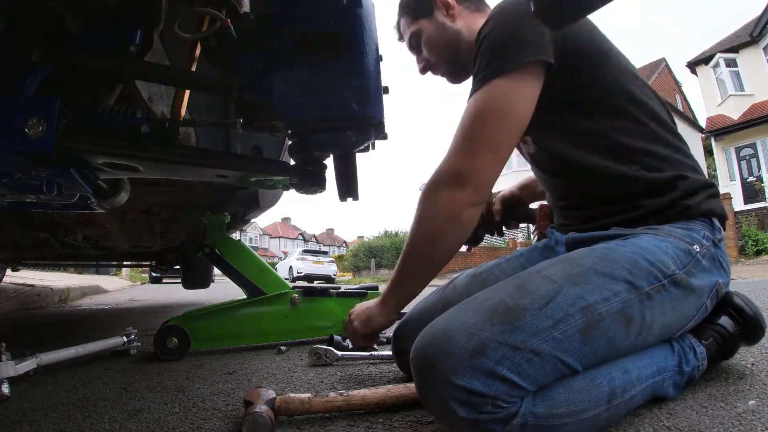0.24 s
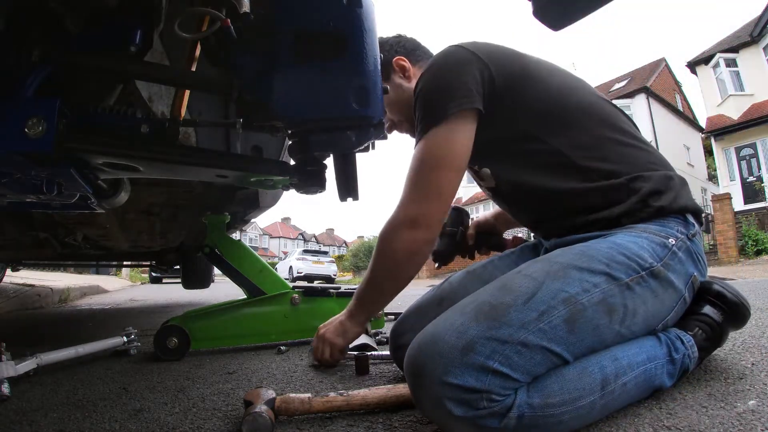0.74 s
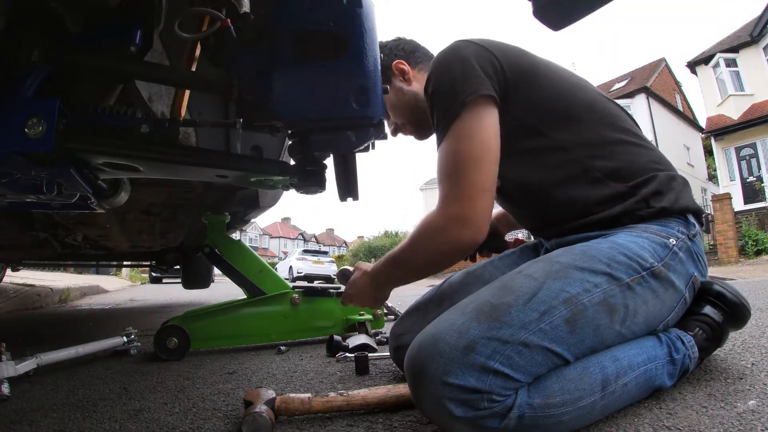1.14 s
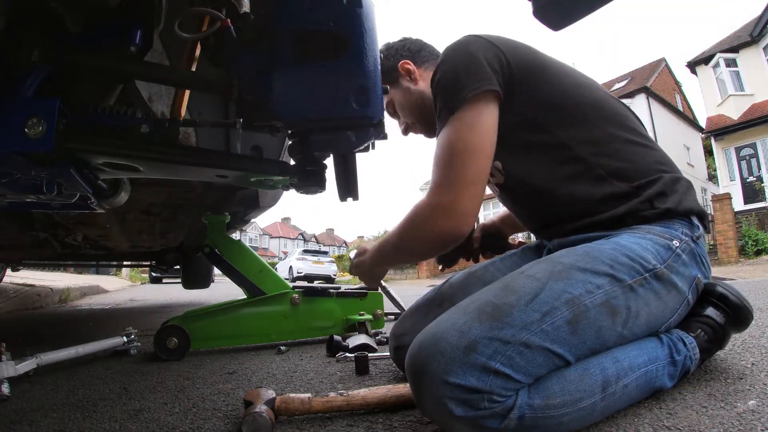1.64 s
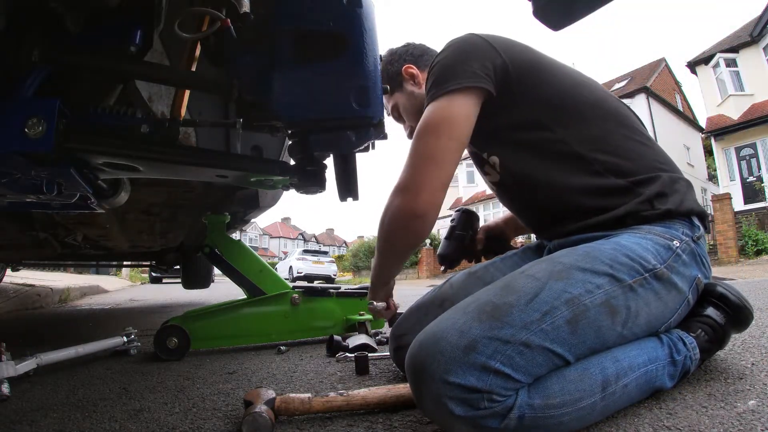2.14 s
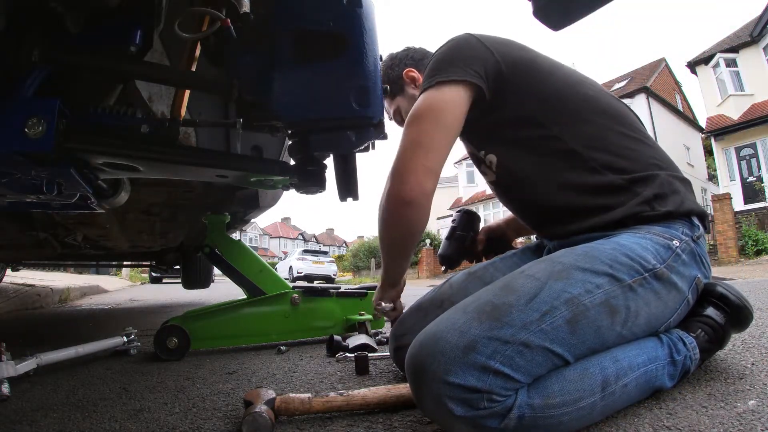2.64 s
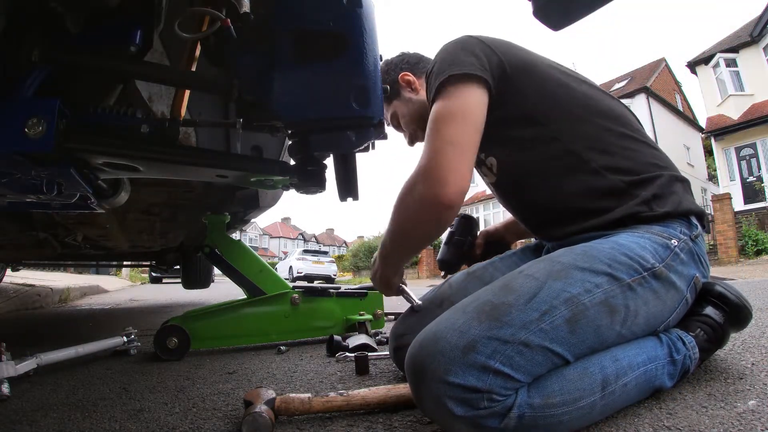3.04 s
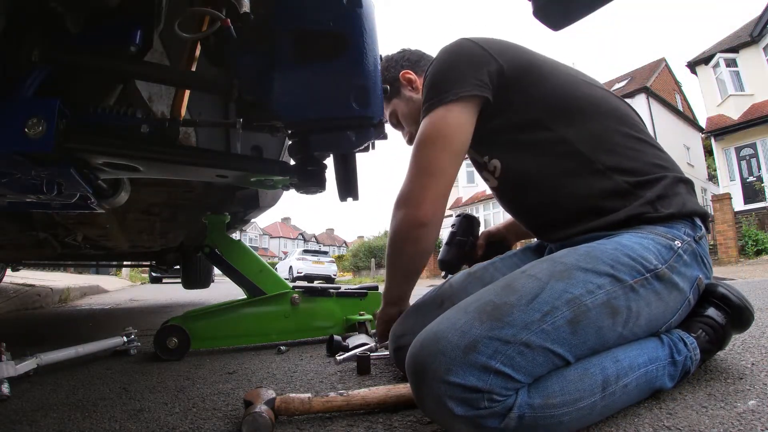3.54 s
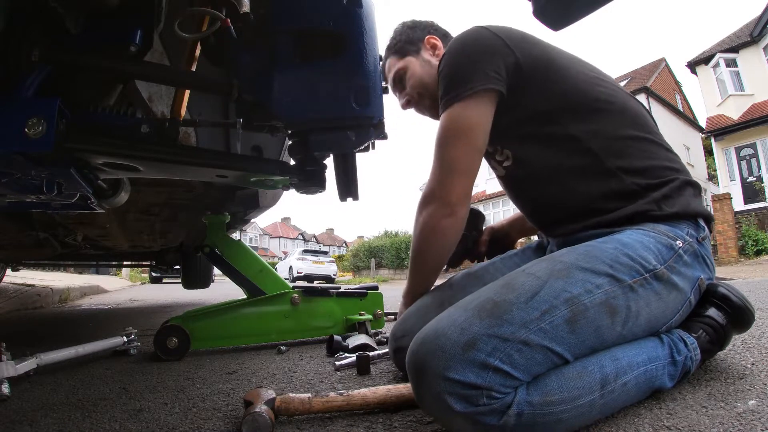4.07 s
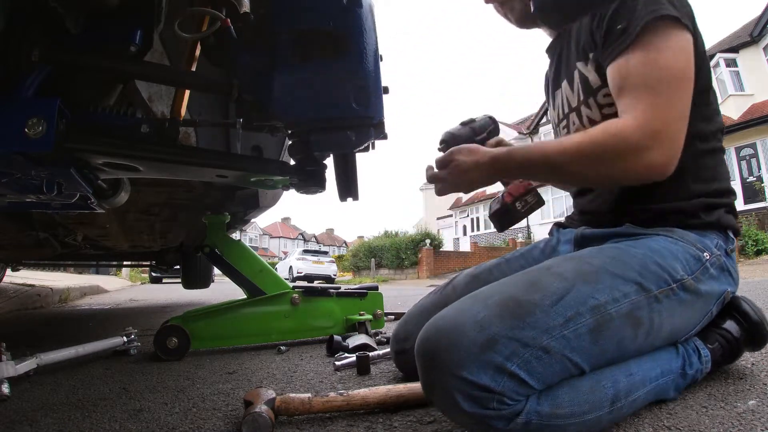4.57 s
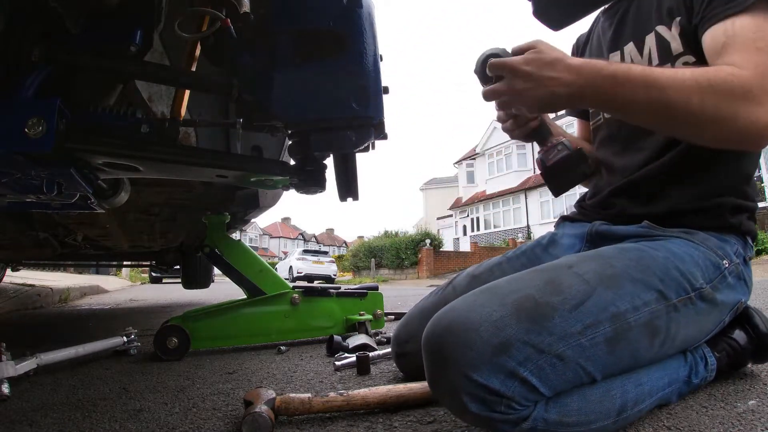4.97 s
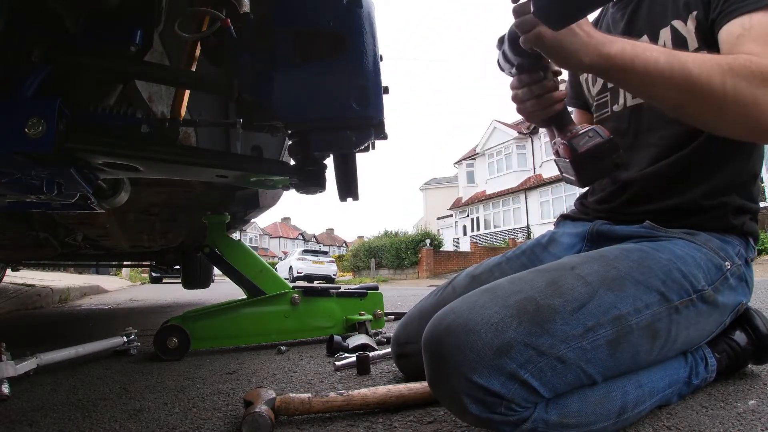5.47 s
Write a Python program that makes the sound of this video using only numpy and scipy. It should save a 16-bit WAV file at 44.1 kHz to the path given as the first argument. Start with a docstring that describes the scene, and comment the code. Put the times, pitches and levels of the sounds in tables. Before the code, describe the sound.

Close, dry metal handling outdoors: a couple of thumps and a tiny squeak on tarmac, small clinks around one second, then near silence with soft street rumble. At three seconds a hard bright clank rings out, followed by a denser clatter half a second later, trailing into faint taps. The car's underside adds a short dull echo; far birds call faintly. Centred sound, microphone low beside the tools.

```python
"""On the tarmac beside a jacked-up car, steel sockets and an extension bar are picked over.
They knock (short noise bursts), scrape (trains of tiny impacts) and ring (fading sine waves)
until a neighbour or the hand stills them; the underbody throws knocks and scrapes back as an echo.
Around them: a breezy suburban street and rustling clothes (shaped noise), a low hum and boom,
and a few far bird calls (gliding tones with overtones)."""
import sys
import numpy as np
from scipy import signal
from scipy.fft import rfft, irfft, next_fast_len
from scipy.io import wavfile

SR = 44100
rng = np.random.default_rng(int(sys.argv[2]) if len(sys.argv) > 2 else 0)


def materialize(psi):
    """Save the field psi as 16-bit PCM at rate SR to the path in sys.argv[1].

    A 1-D psi becomes a single channel; in a 2-D psi each row is a channel.
    """
    bounded = np.clip(np.atleast_2d(psi).T, -1, 1)
    quanta = np.round(bounded * 32767).astype(np.int16)
    wavfile.write(sys.argv[1], SR, quanta)


N = 251811
TIME = np.arange(N) / SR   # seconds

# street loudness over time: time_s, deep_rumble_db, hollow_body_db
STREET_LEVELS = [(0.0, -49, -55.5), (0.17, -52.5, -47), (1.19, -47, -40.5), (1.54, -45, -50.5),
                 (2.11, -55, -46), (2.16, -41, -46), (2.29, -47.5, -45.5), (3.12, -42.5, -46),
                 (3.28, -64.5, -50), (3.67, -54.5, -55), (4.91, -59.5, -49.5), (4.96, -43, -60),
                 (5.01, -54.5, -44), (5.17, -62, -50.5), (5.23, -42, -53.5), (5.47, -57, -50.5),
                 (5.66, -45, -48.5), (5.71, -46.5, -51.5)]
# street hiss loudness over time: time_s, level_db
HISS_LEVELS = [(0, -61.5), (.95, -61.5), (1.3, -66.5), (2.7, -67), (4.0, -66.5), (5.1, -65.5), (5.71, -66)]
# colour of the deep rumble, the hollow body and the hiss: frequency_hz, level_db (per Hz)
DEEP_COLOUR = [(11, -37.5), (18, -3.5), (32, -1), (81, 6.5), (124, -4.5), (160, -11), (210, -33),
               (350, -120)]
BODY_COLOUR = [(65, -37.5), (110, -19), (129, -7), (200, 0.5), (306, -13), (335, -15), (398, -18.5),
               (433, -27), (700, -33.5), (910, -56), (1540, -120)]
HISS_COLOUR = [(280, 5), (480, 0.5), (745, 3), (1720, -9), (2140, -12), (3090, -19.5), (4600, -20.5),
               (5250, -15.5), (6440, -16.5), (7350, -30.5), (10200, -30), (16000, -44)]
GUST_DB, GUSTS_PER_S = 1, 9   # spread and speed of the breeze's wavering
HUM_S, HUM_LENGTH_S, HUM_HZ, HUM_DB = 3.97, 0.28, 172.3, -43.5
THUD_S, THUD_DB, THUD_HZ, THUD_WIDTH_HZ, THUD_T60_S = 3.3, -42.5, 62, 45, .45

# gliding calls of the birds, and one lower call: start_s, length_s, middle_pitch_hz, level_db
BIRD_CALLS = [(1.01, .115, 1678, -45.5), (2.3, 0.18, 2167, -63.5), (2.8, 0.11, 1692, -46),
              (4.42, 0.18, 2324, -66), (5.61, 0.11, 2304, -64)]
LOW_CALL = [(-0.054, 0.16, 610, -52)]
# overtones of each kind of call: harmonic_number, level_db
BIRD_HARMONICS = [(1, -19), (2, -1), (3, -12), (4, -26)]
LOW_CALL_HARMONICS = [(1, -3.5), (2, -2.5), (3, -8), (4, -21)]
# pitch glide of each kind of call, as shares of the middle pitch: first_share, last_share
BIRD_GLIDE = (1, .72)
LOW_CALL_GLIDE = (1.02, 0.78)

# clothes rustle as the body leans and the arm reaches: start_s, length_s, level_db
MOVES = [(0.16, 0.4, -71), (.85, 0.39, -68), (1.5, 0.4, -76), (2.85, 0.54, -70), (3.498, 0.64, -67.5),
         (4.23, 0.74, -72.5), (4.903, 0.29, -74)]
# colour of rustling cloth: frequency_hz, level_db (per Hz)
CLOTH_COLOUR = [(500, -20.5), (1500, -1.5), (3500, 0.5), (6200, 0), (7500, -8.5), (10000, -15.5),
                (11500, -27.5), (16000, -43.5)]
RESTING_RUSTLE_DB = -75

# dull knocks of tools on the ground: start_s, level_db, brightness_hz
KNOCKS = [(0.159, -18.5, 1180), (0.291, -23, 950), (0.3619, -17.5, 4170), (0.3657, -24, 4000),
          (0.404, -34, 3480), (0.418, -26.5, 2000), (3.023, -18, 1490), (3.226, -36, 3500),
          (3.589, -22, 3170)]
# well-damped resonances of those knocks: frequency_hz, width_hz, level_db
KNOCK_BODY = [(376.5, 160, -10.5), (860, 400, -1.5), (1285, 210, 4), (1560, 260, 3), (2368, 330, 3.5),
              (2865, 81, 10), (3260, 360, 3.5), (4434, 280, 2.5), (5336, 340, -0.5), (8500, 1600, -14)]
KNOCK_RISE_CYCLES = 0.86   # counted at the brightness: the duller a knock, the longer it takes to build
# a squeak: start_s, length_s, middle_pitch_hz, level_db
SQUEAK = [(0.186, 0.0312, 2820, -46)]
# overtones of the squeak: harmonic_number, level_db
SQUEAK_HARMONICS = [(1, 0), (2, -10), (3, -11.5), (4, -29)]
# pitch glide of the squeak, as shares of the middle pitch: first_share, last_share
SQUEAK_GLIDE = (.82, 1.11)

# overall colour of the heap of tools: frequency_hz, level_db
HEAP_COLOUR = [(200, -8.5), (600, -11), (1200, -4), (2000, -2), (8000, 0.5), (10000, -8), (10900, -21.5),
               (14500, -19), (16000, -48.5)]
# resonances of the heap of tools: frequency_hz, width_hz, boost_db
HEAP_PEAKS = [(1250, 8.8, 12), (2026, 120, 6.3), (2110, 37, 3.2), (2844, 110, 10), (3150, 180, 6),
              (3575, 270, 11), (4420, 51, 5.6), (4670, 520, 8.8), (6250, 330, 10), (7530, 150, 6),
              (8170, 100, 6), (9100, 57, 2.6), (10020, 260, 12), (11870, 250, 6), (14050, 350, 8)]
# steel dragged over steel and grit: start_s, length_s, level_db (before the stroke shape), brightness_hz
SCRAPES = [(0, 0.044, -66, 1370), (0.186, 0.11, -58.5, 2760), (0.376, 0.24, -65.5, 2380),
           (0.764, 0.11, -42.5, 5000), (1.02, 0.065, -57, 5000), (3.032, 0.24, -45.5, 9000),
           (3.596, .17, -36.5, 8250), (3.901, 0.095, -56, 1820), (4.073, 0.12, -55, 2170),
           (4.522, 0.084, -82, 5000)]

# a tool lands on one end, then slaps down on the other:
# start_s, level_db, treble_tilt_db (per octave), gap_s, second_touch_db, bar_ring_db
CLANKS = [(0.7656, -34.5, -3.5, 0.017, -31, -45.5), (1.0165, -36, -6, 0.0098, -27, -30),
          (1.0624, -46, -5, 0.0047, -33, -41.5), (3.0255, -18, 6, 0.011, -17, -37),
          (3.5034, -23.5, -2, 0.0039, -18.5, -32), (3.5905, -18.5, -2, .013, -25.5, -18),
          (3.6385, -11.5, 1, 0.024, -23, -18.5), (3.6959, -22, 3.5, 0.014, -15.5, -25.5),
          (4.119, -31.5, 4.5, .0155, -33.5, -71)]
# added to the tilt, dB per octave: the slap is brighter than the landing
FIRST_TILT_DB, SECOND_TILT_DB = -0.5, 4.5
# a tool rocks to rest in three even touches:
# start_s, level_db, treble_tilt_db (per octave), gap_s, loss_per_touch_db
RATTLES = [(0.8402, -28.5, -2.5, 0.028, 4), (3.7368, -22.5, 8, .0265, 12.5)]
# single light touches: start_s, level_db, treble_tilt_db (per octave)
TAPS = [(0.7383, -45, -3.5), (0.8114, -33, 4), (0.9624, -40.5, -5), (0.9825, -43, -4), (1.148, -49.5, -7),
        (1.298, -43, 0.5), (2.1024, -55, 1), (3.1706, -23.5, 4.5), (3.916, -30.5, -0.5),
        (4.0362, -45.5, 3.5), (4.337, -46.5, 2), (4.3942, -38, 4.5), (4.5273, -51.5, 0), (4.562, -48.5, -3),
        (4.5804, -54.5, 13)]
# highest strong treble of a touch at a reference level, and how far it moves with the level
TOP_HZ, TOP_AT_DB, TOP_OCTAVES_PER_DB = 11500, -24, .018
BAR_LAG_S, BAR_FREE_S = .003, 0.027   # after a clank the bar rings late; after any touch it rings free briefly
BAR_TILT_DB, TAP_RING_DB = 1.5, -20   # clank tilt per octave; ring under a light touch, relative to it

# ringing tones (modes) of each steel part: frequency_hz, level_db, t60_s (time to fade 60 dB by itself)
DEEP_SOCKET = [(1281, -36, .7), (1938, -31, .55), (2713, -32, .7), (3510, -23, .7), (6121, -6, .42),
               (6670, -14, 1.0), (7004, 0, .7), (7149, -26, .6), (8931, -29, .6), (9502, -28, .9),
               (9692, -14, .9), (13520, -36, .9), (13770, -41, .7), (14308, -36, .7)]
WIDE_SOCKET = [(2713, -24, .3), (4596, -8, .3), (4619, -.5, .7), (11208, -9, .3), (12510, -27, .3),
               (12790, -21, .35), (14308, -24, .3)]
SHORT_SOCKET = [(6620, 1.5, .17), (6720, -12, 0.0955)]
SMALL_SOCKET = [(6655, -0.5, 1.33), (6679, -4.5, .9)]
BAR = [(1216, -15.5, .12), (3455, -5.5, .3), (3510, 1.5, 0.17), (3500, -28, .9), (4260, -6.5, 0.16),
       (6320, -9.5, .25), (6480, -7, 0.29), (8000, -15.5, 0.064), (8586, -10.5, 0.13), (9071, -13, 0.2),
       (9980, -6.5, .14), (11900, -27, .15), (13980, -30, .14)]
# what sets each socket ringing: start_s, level_db, treble_tilt_db (per octave), rings_free_s
# rows are blows, but the wide socket's from 3.035 to 3.135 s are the pulses of one ring beating at 4619 Hz
DEEP_STARTS = [(0.775, -32, 10, 0.079), (3.0235, -15, 3, 0.007), (3.044, -11, 0.5, 0.16),
               (3.655, -32, 15.5, 0.049)]
WIDE_STARTS = [(0.742, -45, -23, 0.012), (0.772, -29, -19.5, 0.06), (3.035, -18.5, -10.5, 0.015),
               (3.082, -22.5, -9.5, 0.018), (3.135, -27.5, 12.5, 0.06), (3.688, -28, -7, 0.024)]
SHORT_STARTS = [(1.027, -25.5, -0.5, 0.0031), (3.508, -17.5, -1.5, 0.016), (3.641, -28, -2, .01)]
SMALL_STARTS = [(0.79, -35.5, 0, 1.6), (3.045, -38, 0, 0.27)]
ROCKING_DB, RING_LONGEST_S = 1.4, 1.4   # spread of each mode's level; cut-off of every ring
WANDER_RAD, WANDER_PER_S = .6, 26   # size and speed of each mode's phase wander
CUTOFF_HZ = 15450


def from_db(db):
    """Turn decibels into a gain."""
    return 10 ** (np.asarray(db) / 20)


def rms_one(x):
    """Scale a sound to an average strength (rms) of one."""
    return x / np.sqrt(np.mean(x ** 2) + 1e-20)


def in_time(rows):
    """Draw one curve per column, with a value for every sample."""
    s, *columns = np.transpose(rows)
    return [np.interp(TIME, s, column) for column in columns]


def at_hz(points, hz):
    """Read a colour table at any frequency, along a log-frequency axis."""
    f, db = np.transpose(points)
    return np.interp(np.log(np.maximum(hz, 1)), np.log(f), db)


def octaves(hz):
    """Count octaves from 5 kHz, limited to the range over which hardness tilts a touch's sound."""
    return np.log2(np.clip(hz, 1500, 8500) / 5000)


def drift(rate, size):
    """Wander by chance: straight lines join random points, `rate` of them per second."""
    steps = np.arange(size) * rate / SR
    return np.interp(steps, np.arange(4096), rng.standard_normal(4096))


def swell(s, length):
    """Rise from time s and fall again, as half a sine wave."""
    return np.sin(np.pi * np.clip((TIME - s) / length, 0, 1))


def add(track, s, sound):
    """Mix a sound into the track at time s, trimming what falls outside."""
    start = int(round(s * SR))
    sound = sound[max(-start, 0):max(N - start, 0)]
    first = max(start, 0)
    track[first:first + len(sound)] += sound


def lowpass(x, hz):
    """Soften everything above a frequency."""
    return signal.sosfilt(signal.butter(2, hz, fs=SR, output="sos"), x)


def resonate(x, hz, width_hz):
    """Let one frequency ring out, with unit gain at its peak."""
    r = np.exp(-np.pi * width_hz / SR)
    top = np.array([1, 0, -1]) * (1 - r * r) / 2
    return signal.lfilter(top, [1, -2 * r * np.cos(2 * np.pi * hz / SR), r * r], x)


def noise(colour, size):
    """Shape random noise to a given colour, rms one."""
    padded = next_fast_len(size)
    hz = np.fft.rfftfreq(padded, 1 / SR)
    spectrum = rfft(rng.standard_normal(padded)) * from_db(at_hz(colour, hz))
    return rms_one(irfft(spectrum, padded)[:size])


def echoes(x, t60, gap):
    """Add up dense random reflections that begin after a gap and die away; times in seconds."""
    t = TIME[:SR]
    tail = rng.standard_normal(SR) * from_db(-60 * t / t60) * (t > gap)
    tail = tail / np.sqrt(np.sum(tail ** 2))
    return signal.fftconvolve(x, tail)[:N]


def glides(calls, glide, harmonics, rough):
    """Stack harmonics on a trembling pitch that follows one smooth curve through each call."""
    out = np.zeros(N)
    curve = np.polyfit([0, .5, 1], [glide[0], 1, glide[1]], 2)
    for s, length, middle_hz, db in calls:
        progress = np.minimum(TIME[:SR // 3] / length, 1)
        pitch_hz = middle_hz * np.polyval(curve, progress)
        trembling_hz = pitch_hz * (1 + rough * drift(700, len(progress)))
        phase = 2 * np.pi * np.cumsum(trembling_hz) / SR
        tone = sum(from_db(level) * np.sin(round(number) * phase) for number, level in harmonics)
        add(out, s, from_db(db) * np.sin(np.pi * progress) * tone)
    return out


def street():
    """Breeze and far traffic: noise as a deep rumble, a hollow body under the car and a faint hiss."""
    deep_db, body_db = in_time(STREET_LEVELS)
    hiss_db, = in_time(HISS_LEVELS)
    deep = from_db(deep_db + GUST_DB * drift(GUSTS_PER_S, N)) * noise(DEEP_COLOUR, N)
    body = from_db(body_db + GUST_DB * drift(GUSTS_PER_S, N)) * noise(BODY_COLOUR, N)
    hiss = from_db(hiss_db) * noise(HISS_COLOUR, N)
    return deep + body + hiss


def hum():
    """One low note swells briefly; small random shifts of its phase make it waver."""
    tone = np.sin(2 * np.pi * HUM_HZ * TIME + 0.28 * drift(45, N))
    return from_db(HUM_DB) * swell(HUM_S, HUM_LENGTH_S) * tone


def thud():
    """A low boom: noise through one deep resonance, dying away."""
    out, t = np.zeros(N), TIME[:SR]
    boom = rms_one(resonate(rng.standard_normal(SR), THUD_HZ, THUD_WIDTH_HZ))
    boom = boom * from_db(THUD_DB - 60 * t / THUD_T60_S)
    add(out, THUD_S, lowpass(boom, 3 * THUD_HZ))
    return out


def birds():
    """Far, rasping calls glide in pitch and are heard largely by way of the house fronts."""
    calls = glides(BIRD_CALLS, BIRD_GLIDE, BIRD_HARMONICS, rough=.06)
    calls = calls + glides(LOW_CALL, LOW_CALL_GLIDE, LOW_CALL_HARMONICS, rough=.055)
    early = echoes(calls, t60=0.063, gap=0.00033)
    late = echoes(calls, t60=.6, gap=0.023)
    return from_db(-2.0) * calls + from_db(-3.5) * early + from_db(-5.0) * late


def clothes():
    """Cloth rubs as soft noise with each movement, and hardly at all in between."""
    motion = from_db(RESTING_RUSTLE_DB) + sum(from_db(db) * swell(s, length) for s, length, db in MOVES)
    return motion * noise(CLOTH_COLOUR, N)


def underbody(x, dull_hz):
    """The underside of the car throws back a short, dull echo."""
    return lowpass(echoes(x, t60=0.075, gap=0.0078), dull_hz)


def knocks(crack_t60, tail_t60, tail_db):
    """A tool meets the ground: a short crunch of noise sets off well-damped resonances."""
    crunches, t = np.zeros(N), TIME[:SR // 5]
    for s, db, bright_hz in KNOCKS:
        fade = from_db(-60 * t / crack_t60) + from_db(tail_db - 60 * t / tail_t60)
        crunch = lowpass(rng.standard_normal(len(t)) * fade, bright_hz)
        rise = 1 - np.exp(-t * bright_hz / KNOCK_RISE_CYCLES)
        add(crunches, s, from_db(db) * crunch * rise)
    out = np.zeros(N)
    for k, (hz, width_hz, db) in enumerate(KNOCK_BODY):
        out += (-1) ** k * from_db(db) * resonate(crunches, hz, width_hz)   # signs alternate
    return out


def heap(x):
    """The resonances of the heap of tools colour whatever touches it."""
    return x + sum((from_db(db) - 1) * resonate(x, hz, width_hz) for hz, width_hz, db in HEAP_PEAKS)


def scrapes(catches_per_s, spread_db):
    """Sliding parts catch and slip in a dense, uneven train of tiny impacts."""
    out, size = np.zeros(N), SR // 4
    hz = np.fft.rfftfreq(size, 1 / SR)
    for s, length, db, bright_hz in SCRAPES:
        caught = rng.random(size) < catches_per_s / SR
        catches = caught * rng.standard_normal(size) * from_db(spread_db * drift(250, size))
        colour = from_db(at_hz(HEAP_COLOUR, hz)) / np.sqrt(1 + (hz / bright_hz) ** 4)
        grit = irfft(rfft(catches) * colour, size)
        stroke = np.sin(np.pi * np.minimum(TIME[:size] / length, 1) ** .8)
        add(out, s, from_db(db) * stroke * rms_one(heap(grit)))
    return out


def touches():
    """List every touch of steel on steel (start_s, level_db, tilt_db) and the blows these give the bar."""
    light = list(TAPS)
    for s, db, tilt_db, gap_s, loss_db in RATTLES:
        light += [(s + k * gap_s, db - k * loss_db, tilt_db) for k in range(3)]
    bar_blows = [(s, db + TAP_RING_DB, tilt_db, BAR_FREE_S) for s, db, tilt_db in light]
    hard = []
    for s, db, tilt_db, gap_s, second_db, ring_db in CLANKS:
        hard.append((s, db, tilt_db + FIRST_TILT_DB))
        hard.append((s + gap_s, second_db, tilt_db + SECOND_TILT_DB))
        bar_blows.append((s + BAR_LAG_S, ring_db, tilt_db + BAR_TILT_DB, BAR_FREE_S))
    return hard + light, bar_blows


def contacts(hits, rise, crack_t60, tail_t60, tail_db, grain_db):
    """Each touch is a gritty crack with a short clatter behind it; louder ones start faster and brighter."""
    out, size = np.zeros(N), SR // 4
    t, hz = TIME[:size], np.fft.rfftfreq(size, 1 / SR)
    for s, db, tilt_db in hits:
        hardness = 2 ** (TOP_OCTAVES_PER_DB * (db - TOP_AT_DB))
        top_hz, rise_s = TOP_HZ * hardness, rise / hardness
        colour = from_db(db + tilt_db * octaves(hz) + at_hz(HEAP_COLOUR, hz))
        colour = colour / np.sqrt(1 + (hz / top_hz) ** 6)
        grit = irfft(rfft(rng.standard_normal(size)) * colour, size)
        fade = from_db(-60 * t / crack_t60) + from_db(tail_db - 60 * t / tail_t60)
        grain = from_db(grain_db * drift(760, size))
        add(out, s, grit * fade * (1 - np.exp(-t / rise_s)) * grain)
    return heap(out)


def ringing(modes, starts, rise, still_s, still_db, held_t60, buzz, spread_db=0):
    """A steel part rings on its modes, buzzing on its neighbours, until it is stilled and dies faster."""
    out, t = np.zeros(N), TIME[:int(RING_LONGEST_S * SR)]
    holds, loose = [], np.zeros(N)
    for s, start_db, tilt_db, free_s in starts:
        held_s = np.maximum(t - free_s, 0)
        stilled = np.minimum(held_s / still_s, 1)   # 0 while free, 1 once stilled
        level_db = start_db - still_db * stilled - 60 * held_s / held_t60
        holds.append((1 - np.exp(-t / rise)) * from_db(level_db))
        add(loose, s, 1 - stilled)
    for hz, mode_db, t60 in modes:
        # every blow or pulse adds its energy to what is still ringing
        energy, decay = np.zeros(N), from_db(-60 * t / t60)
        # with a spread, each start favours some modes, as where a blow lands would
        strengths_db = spread_db * rng.standard_normal(len(starts))
        for (s, start_db, tilt_db, free_s), hold, strength_db in zip(starts, holds, strengths_db):
            strength = from_db(strength_db + tilt_db * octaves(hz))
            add(energy, s, (hold * decay * strength) ** 2)
        # rocking makes each mode swell, sink and wander a little
        rocking = from_db(mode_db + ROCKING_DB * drift(70, N))
        wander = WANDER_RAD * drift(WANDER_PER_S, N)
        # tiny re-contacts jog its phase while the part is loose
        jog = buzz * np.minimum(loose, 1) * drift(500, N)
        tone = np.sin(2 * np.pi * (hz * TIME + rng.random()) + wander + jog)
        out += np.sqrt(energy) * rocking * tone
    return out


def scene():
    """Tools close by, the street behind; all reaches both channels alike."""
    background = street() + hum() + thud() + birds() + clothes()
    ground = knocks(crack_t60=0.012, tail_t60=0.072, tail_db=-13.0)
    ground = ground + glides(SQUEAK, SQUEAK_GLIDE, SQUEAK_HARMONICS, rough=0.054)
    hits, bar_blows = touches()
    clatter = contacts(hits, rise=0.0038, crack_t60=0.015, tail_t60=0.05, tail_db=-3.5, grain_db=4.0)
    clatter = clatter + scrapes(catches_per_s=2500, spread_db=4.0)
    deep = ringing(DEEP_SOCKET, DEEP_STARTS, rise=.003, still_s=.08, still_db=16, held_t60=.6, buzz=.14)
    wide = ringing(WIDE_SOCKET, WIDE_STARTS, rise=.01, still_s=0.025, still_db=14, held_t60=.7, buzz=0.22)
    short = ringing(SHORT_SOCKET, SHORT_STARTS, rise=0.00155, still_s=.02, still_db=8, held_t60=1.0, buzz=0.197)
    small = ringing(SMALL_SOCKET, SMALL_STARTS, rise=.004, still_s=0.084, still_db=2, held_t60=0.96, buzz=.03)
    bar = ringing(BAR, bar_blows, rise=.0015, still_s=.04, still_db=12, held_t60=1.5, buzz=.25, spread_db=1.8)
    tools = deep + wide + short + small + bar + clatter + ground
    echo = from_db(-13) * underbody(clatter + ground, dull_hz=7000)
    return np.tile(background + tools + echo, (2, 1))


def record(dry):
    """Cut the top steeply with a low-pass filter."""
    return signal.sosfilt(signal.ellip(10, .1, 80, CUTOFF_HZ, fs=SR, output="sos"), dry)


dry = scene()
out = record(dry)
materialize(out)
```